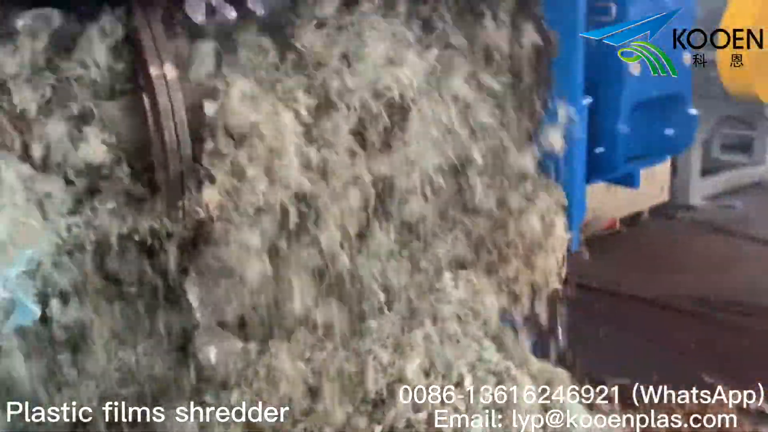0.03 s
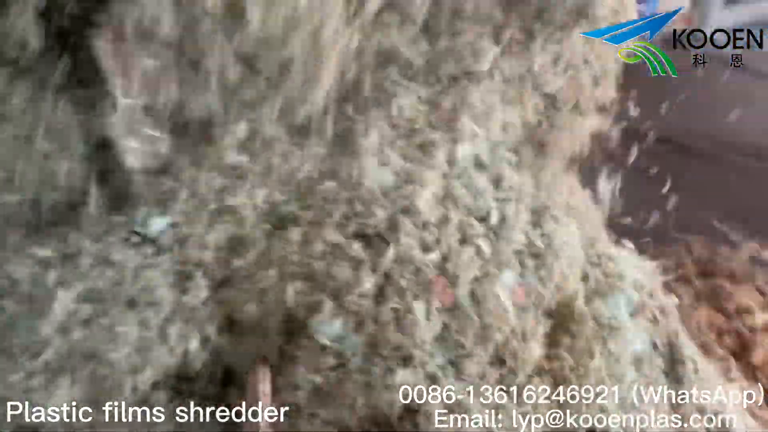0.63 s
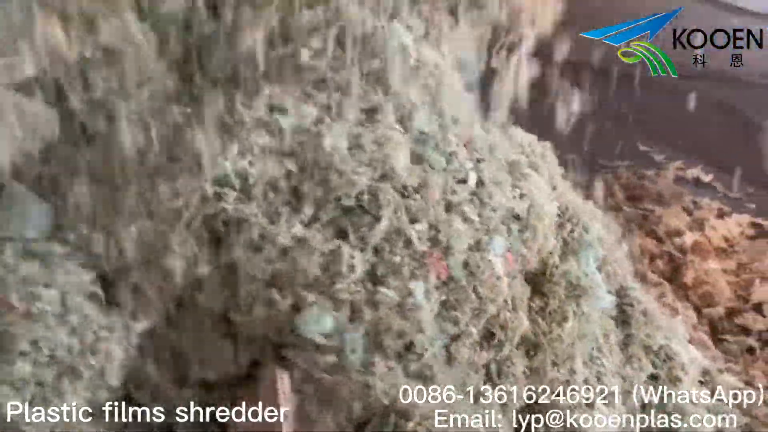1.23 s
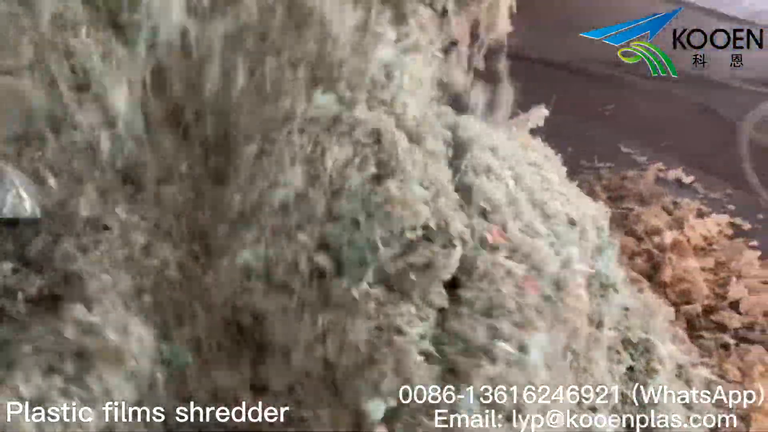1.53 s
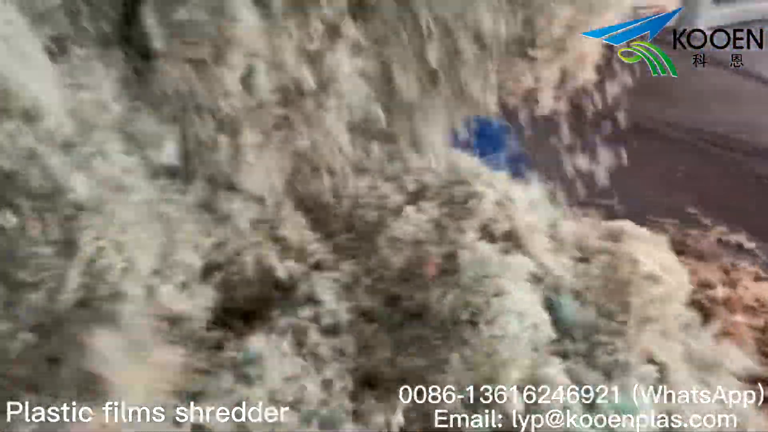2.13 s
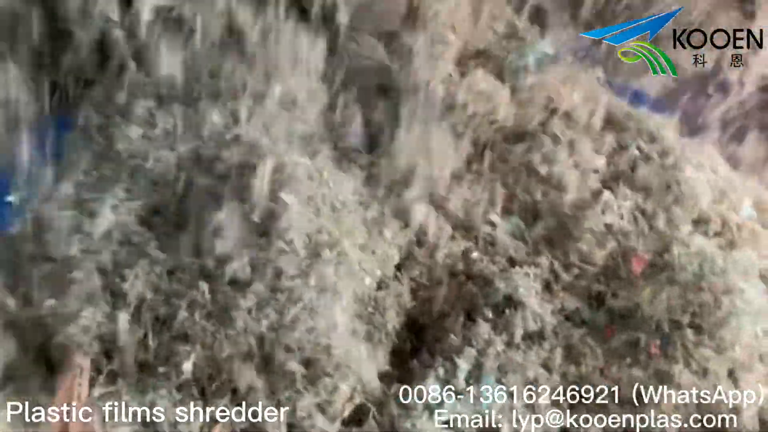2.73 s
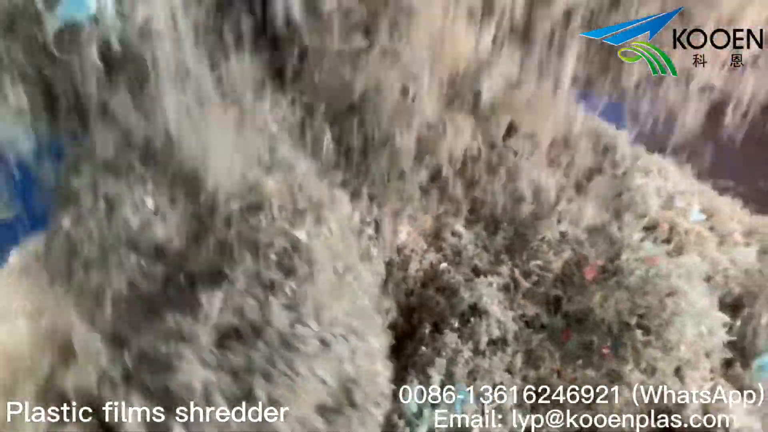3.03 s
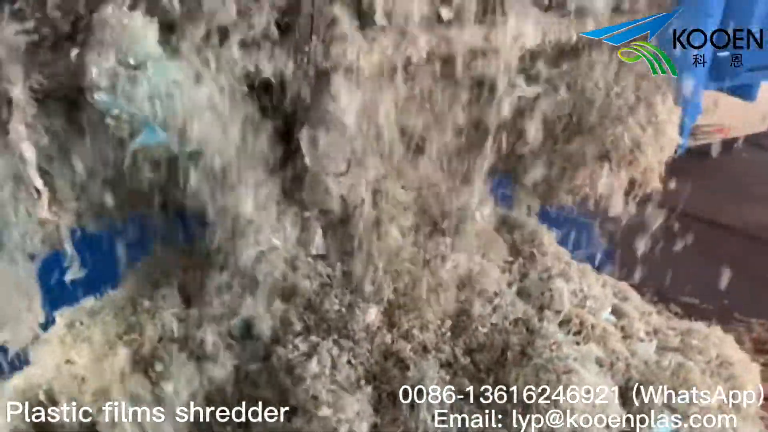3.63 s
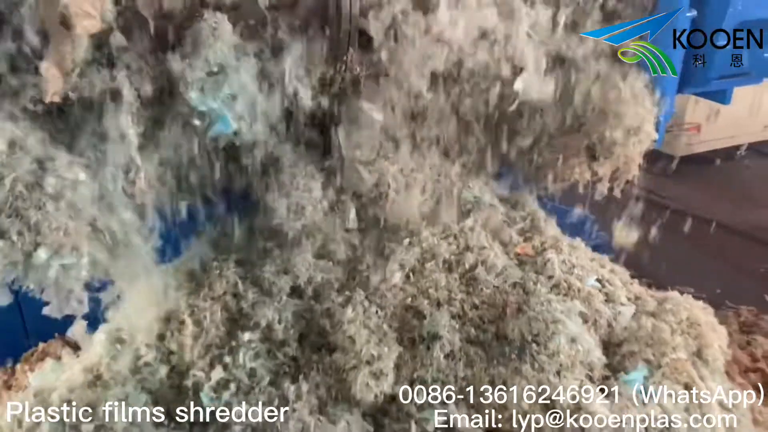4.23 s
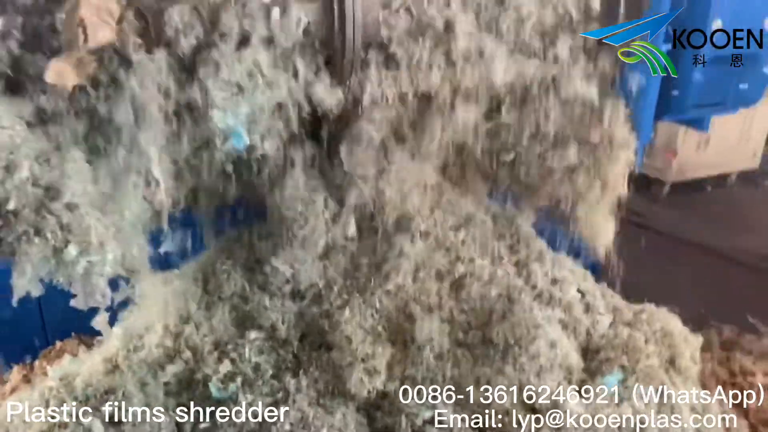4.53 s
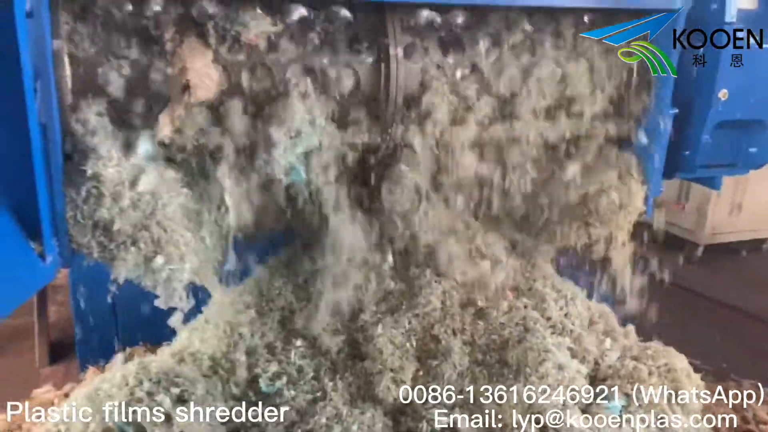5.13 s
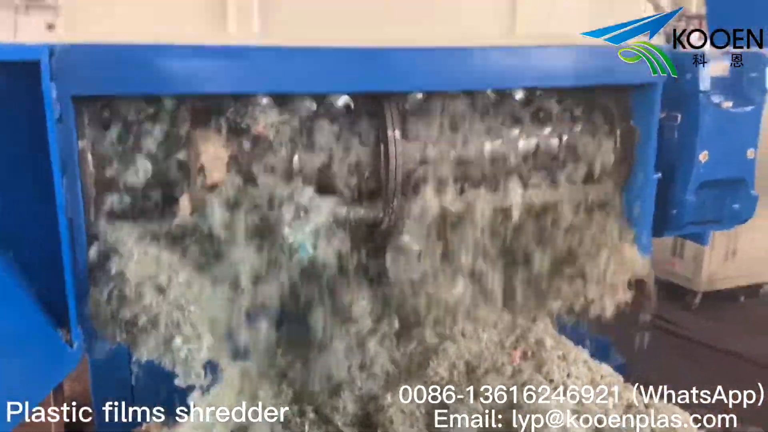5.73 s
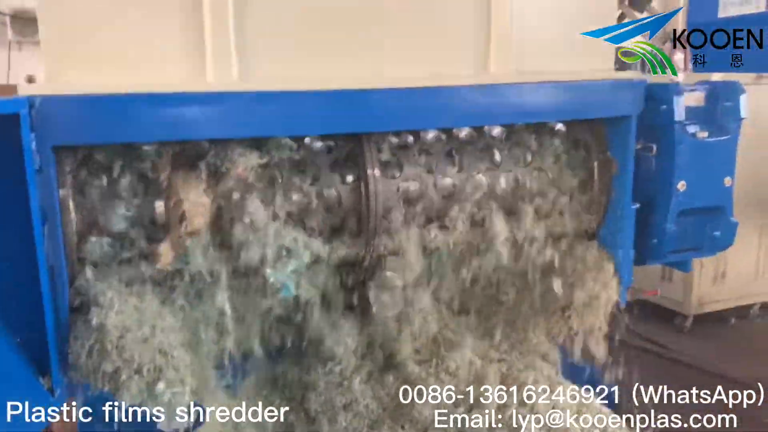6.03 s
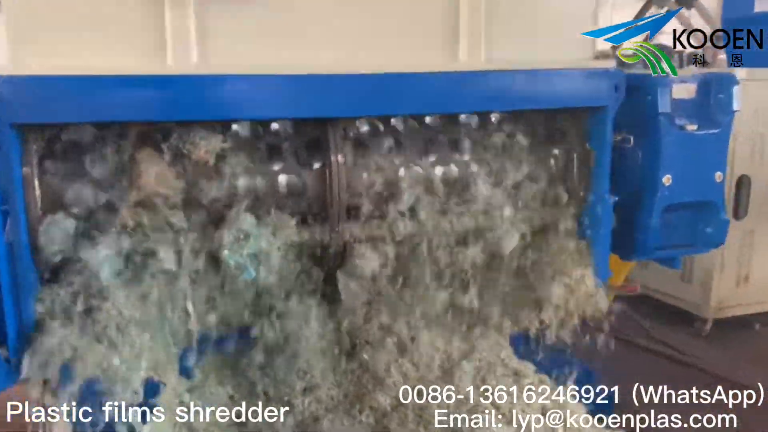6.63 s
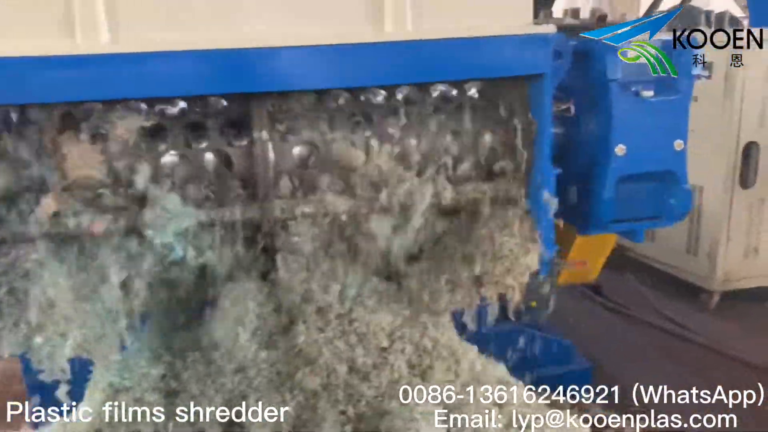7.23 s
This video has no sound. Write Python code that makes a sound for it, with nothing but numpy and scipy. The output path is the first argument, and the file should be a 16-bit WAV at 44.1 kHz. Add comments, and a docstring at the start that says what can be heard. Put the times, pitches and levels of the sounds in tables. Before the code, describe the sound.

An industrial shredder drones with a deep throb as plastic film churns, grinds and rustles out, with a few thumps and hard knocks.

```python
"""A throbbing drone fills a factory hall: a single-shaft shredder's knife rows drive its housing.
The microphone stands close to the screen, then moves a step back. Plastic film churns and grinds inside,
squeaks on the knives and rustles out through the screen, whose steel sings faintly. Wads thump in the
hopper; hard lumps knock in the cutting chamber, and the limiter ducks for a moment at the loudest."""
import sys
import numpy as np
from scipy import signal
from scipy.fft import rfft, irfft
from scipy.io import wavfile
from scipy.ndimage import uniform_filter1d

SR = 44100
rng = np.random.default_rng(int(sys.argv[2]) if len(sys.argv) > 2 else 0)


def bounce(signal):
    """Save signal as a 16-bit WAV file at the path given by the first command-line argument."""
    frames = np.transpose(np.atleast_2d(signal))
    limited = np.clip(frames, -1, 1)
    pcm = np.round(limited * 32767).astype(np.int16)
    wavfile.write(sys.argv[1], SR, pcm)


N = 321048

# the knives bite at an even rate; the drone swells at each bite, a little earlier with every second
BITES_PER_S, FIRST_SWELL_S, SWELL_CREEP_S_PER_S = 5.752, .032, .0032
# the microphone steps back and the machine's bass falls away
STEP_BACK_S, STEP_LENGTH_S, STEP_LOSS_DB = 3.93, 0.96, 6
# film inside the machine: time_s, churning_db, grinding_db, scraping_db
FILM_FEED = [(0.0, -28, -37.5, -43), (0.5, -20.5, -32.5, -41.5), (0.9, -26, -36, -40),
             (2.0, -26.5, -36.5, -38.5), (2.6, -25.5, -36, -38.5), (3.0, -27.5, -37.5, -41.5),
             (3.7, -25.5, -37.5, -39), (4.75, -26, -34, -37), (5.3, -30.5, -35, -40),
             (5.6, -29.5, -38.5, -40.5), (5.9, -26, -33, -40), (6.5, -29.5, -33.5, -38),
             (7.28, -27.5, -30.5, -37)]


def from_db(db):
    """Decibels to gain."""
    return 10 ** (np.asarray(db) / 20)


def rms_one(x):
    """Scale to unit rms."""
    return x / np.sqrt(np.mean(x ** 2) + 1e-20)


def seconds():
    """Time of every sample."""
    return np.arange(N) / SR


def in_time(rows):
    """One curve for each column after a table's time column."""
    times, *columns = np.transpose(rows)
    return [np.interp(seconds(), times, column) for column in columns]


def swell(centre_s, half_length_s):
    """A smooth rise and fall of height 1 around a moment."""
    return np.exp(-((seconds() - centre_s) / half_length_s) ** 2)


def bins():
    """Frequency of every spectral bin."""
    return np.arange(N // 2 + 1) * SR / N


def gain_curve(points):
    """Gain per bin from (Hz, dB) points joined on a log axis."""
    hz, db = np.transpose(points)
    return from_db(np.interp(np.log(bins() + 1), np.log(hz), db))


def resonance(hz, width_hz):
    """Response of one damped resonance per bin."""
    return 1j * bins() * width_hz / (hz ** 2 - bins() ** 2 + 1j * bins() * width_hz)


def drift(rate_hz):
    """A slow random wander with spread 1."""
    points = N // 100
    hz = bins()[:points // 2 + 1]
    spectrum = rfft(rng.standard_normal(points)) * (hz > 0) / (1 + (hz / rate_hz) ** 2) ** 2
    return np.interp(np.arange(N) * points / N, np.arange(points), rms_one(irfft(spectrum, points)))


def white():
    """Two unrelated white noises."""
    return rng.standard_normal((2, N))


def grains(per_s, spread_db, share):
    """Random snaps of uneven size on a smooth bed; share is their part of the power."""
    sizes = from_db(spread_db * np.minimum(rng.exponential(1, (2, N)), 4))
    snaps = sizes * np.sign(white()) * (rng.random((2, N)) < per_s / SR)
    return np.sqrt(share) * rms_one(snaps) + np.sqrt(1 - share) * white()


def radiate(source, colour):
    """Colour a pair of excitations and spread them to left and right; rms 1."""
    # the hall makes the treble diffuse: frequency_hz, side_minus_mid_db
    hall_width = [(30, -26), (80, -18), (170, -16), (300, -11), (600, -2.5), (1100, 1), (11000, -1)]
    mid, side = rfft(source)
    width = gain_curve(hall_width)
    pair = (mid + side * width * [[1], [-1]]) / np.sqrt(1 + width ** 2)
    return rms_one(irfft(pair * colour, N))


def hall_tone(cycles):
    """A tone of random phase; the hall puts either channel a quarter cycle ahead of the other."""
    apart = rng.choice([-1, 1]) * np.array([[0], [1 / 4]])
    return np.sin(2 * np.pi * (cycles + rng.random() + apart))


def stepped_back():
    """How far the microphone has moved back, from 0 to 1."""
    return np.clip((seconds() - STEP_BACK_S) / STEP_LENGTH_S, 0, 1)


def nearness_db():
    """Level of the machine's bass against that at the close position."""
    return -STEP_LOSS_DB * stepped_back()


def bite():
    """Swings from -1 between bites to 1 as a knife row digs in."""
    return np.cos(2 * np.pi * BITES_PER_S * (seconds() * (1 + SWELL_CREEP_S_PER_S) - FIRST_SWELL_S))


def rotor_tones(orders, lag_s, waver, lean_db=0, pointed=1):
    """Multiples of the bite rate swell together at each bite, each wavering a little."""
    t = seconds()
    # the swells creep earlier, while the centre pitch stays put
    slip = BITES_PER_S * (SWELL_CREEP_S_PER_S * t - FIRST_SWELL_S - lag_s)
    centre = np.mean([multiple for multiple, db in orders])
    out = 0
    for multiple, db in orders:
        step = multiple - centre
        cycles = multiple * BITES_PER_S * t + step * slip
        unsteady = 1 + waver * (drift(1.1) + 1j * drift(1.0))
        gain = from_db(db + np.clip(step, -.5, 2) * lean_db) * (pointed if abs(step) > 1 else 1)
        out = out + gain * np.real(unsteady * np.exp(2j * np.pi * cycles))
    return np.sqrt(2) * out


def housing(drone_db, upper_drone_db, boom_db, upper_boom_db, upper_rise_db, pan_db):
    """Knife rows drive two housing resonances, louder with effort; uneven feed adds a boom to each."""
    # multiples of the bite rate that each resonance picks out: multiple, level_db
    drone_orders = [(25, -25), (26, -4.3), (27, -3.6), (28, -14.5)]
    upper_orders = [(33, -18.5), (34, -6.5), (35, -3.5), (36, -17)]
    # how hard the rotor works: time_s, level_db
    effort = [(0, -1.5), (1.0, -5), (2.0, -1.5), (3.0, 0.3), (3.9, 0), (4.35, -0.6), (6.4, -0.2),
              (7.28, -1.5)]
    # the drone's lean between neighbours; an even pair throbs deepest: time_s, db_per_multiple
    lean = [(0, 1.5), (2, 2.2), (2.5, -1), (4.1, 2), (4.4, -4.5), (5.1, -3), (5.5, -5), (7.3, -4.5)]
    # shape of the swells (1 pointed, 0 round, below 0 flat as the knives stay buried): time_s, shape
    swell_shape = [(0, 1.3), (2.25, 1.1), (2.6, -.2), (3.2, .1), (4.1, -.3), (5, .3), (7.28, .6)]
    effort_db, = in_time(effort)
    lean_db, = in_time(lean)
    pointed, = in_time(swell_shape)
    drone = rotor_tones(drone_orders, lag_s=0, waver=.06, lean_db=lean_db, pointed=pointed)
    boom = radiate(white(), resonance(153.5, 32) ** 2)
    # the boom swells with each bite and fills the hall, so it fades less from a step back
    main = from_db(nearness_db()) * drone + from_db(boom_db + 3 * bite() + .7 * nearness_db()) * boom
    upper_drone = rotor_tones(upper_orders, lag_s=0.06, waver=0.16)
    upper_boom = from_db(upper_boom_db) * radiate(white(), resonance(202.8, 13.6) ** 2)
    # the upper resonance stands in the hall and is a little louder a step back
    upper = (upper_drone + upper_boom) * from_db(upper_rise_db * stepped_back())
    both = from_db(drone_db) * main + from_db(upper_drone_db) * upper
    return both * from_db(effort_db) * from_db([[pan_db], [-pan_db]])


def drive(frame_db, rumble_db, hum_db):
    """The motor hums, the gears whine and the frame shakes."""
    # steady tones of motor and gearbox: pitch_hz, level_db
    hum_tones = [(318.9, 3), (638, -13)]
    # rise and fall of that hum: time_s, level_db
    hum_level = [(0, -4), (.4, -3.5), (.7, 2.5), (1.2, 3.5), (2, -2.5), (3.0, -1.5), (4.1, -13), (4.8, -5),
                 (6.5, -14), (7.28, -8)]
    # multiples of the bite rate that the frame picks out: multiple, level_db
    frame_orders = [(8, -8.5), (10, -14), (18, -13)]
    # the frame's rumble: frequency_hz, density_db
    rumble_spectrum = [(15, -23), (30, -33), (44, -31), (60, -8), (80, -11.5), (102, -4), (130, -11),
                       (180, -7.5), (300, -54)]
    # mains hum and gear whine, unmoved by the load: pitch_hz, level_db
    whines = [(100, -40), (1749, -55)]
    t = seconds()
    humming_db, = in_time(hum_level)
    hum = sum(from_db(db + .8 * drift(3)) * np.sin(2 * np.pi * hz * t + .12 * drift(2))
              for hz, db in hum_tones)
    frame = rotor_tones(frame_orders, lag_s=0.0376, waver=0.38)
    frame = frame + from_db(rumble_db) * radiate(white(), gain_curve(rumble_spectrum))
    whine = sum(from_db(db + drift(3)) * np.sqrt(2) * np.sin(2 * np.pi * hz * t + drift(1))
                for hz, db in whines)
    return whine + from_db(hum_db + humming_db) * hum + from_db(frame_db + nearness_db()) * frame


def rubbed_steel(rings, waver_db):
    """Friction keeps narrow steel resonances singing, each coming and going."""
    return sum(from_db(db + waver_db * drift(7.0)) * radiate(white(), resonance(hz, width_hz))
               for hz, width_hz, db in rings)


def cutting(churn_db, panels_db, bite_db, grind_db, rings_db):
    """Film is churned and torn inside the chamber; close up, the churning pulses slightly at each bite."""
    # low churning and midrange grinding: frequency_hz, density_db
    churn_spectrum = [(100, -12), (170, 9.5), (230, 2), (300, 3), (400, -2.5), (520, -1.5), (650, -8.5),
                      (900, -18), (1500, -69)]
    grind_spectrum = [(400, 1), (680, 1.5), (1000, 2.5), (1400, -0.5), (1900, -4), (2500, -4.5),
                      (3100, -17.5), (6000, -51)]
    # housing panels rung by tumbling film, and the chamber's rubbed steel: pitch_hz, width_hz, level_db
    panel_rings = [(277.6, 14, -3), (367.6, 8, -6.5), (401, 9.8, -4), (439.5, 5.6, -4), (478.5, 10.5, -2.5),
                   (548, 10.5, -5.5)]
    chamber_rings = [(598, 12, -16), (1533, 25, -24), (2135, 35, -24)]
    churning_db, grinding_db, _ = in_time(FILM_FEED)
    tumbling = from_db(drift(33) + .5 * drift(6)) * grains(per_s=700, spread_db=2.4, share=0.25)
    churn = from_db(churn_db) * radiate(tumbling, gain_curve(churn_spectrum))
    churn += from_db(panels_db) * rubbed_steel(panel_rings, waver_db=2)
    churn *= from_db(bite_db * bite() * (1 - stepped_back()))
    tearing = from_db(1.5 * drift(32)) * grains(per_s=700, spread_db=1.6, share=0.24)
    grind = from_db(grind_db) * radiate(tearing, gain_curve(grind_spectrum))
    grind += from_db(rings_db) * rubbed_steel(chamber_rings, waver_db=1.5)
    return from_db(churning_db) * churn + from_db(grinding_db) * grind


def shower_db():
    """Levels of the rustle and the hiss: a steady flow of flakes that surges as clumps break loose."""
    # flakes passing the holes and falling: time_s, rustle_db, hiss_db
    flow = [(0.0, -43.5, -42.5), (0.55, -43.5, -39), (1.4, -36.5, -35), (3.0, -36, -34), (4.4, -33, -34),
            (5.0, -35.5, -40.5), (5.45, -39.5, -36.5), (6.0, -41.5, -43.5), (7.28, -35, -38.5)]
    # clumps pouring down: centre_s, half_length_s, above_flow_db
    clumps = [(1.447, 0.06, 3.5), (1.565, 0.047, 3), (1.833, 0.14, 2.5), (2.79, 0.047, 2),
              (3.228, 0.018, 1.5), (3.42, .03, 1.5), (3.53, 0.086, 4), (3.92, 0.024, 1.5),
              (4.317, 0.044, -0.5), (4.7, 0.15, 8), (5.402, 0.11, 2), (6.84, 0.13, 3)]
    surges_db = sum(db * swell(centre_s, half_length_s) for centre_s, half_length_s, db in clumps)
    return np.array(in_time(flow)) + surges_db


def tufts_db(per_s, size_db, fade_s):
    """Small tufts tear off at random: the rustle jumps and sinks back."""
    tears = (rng.random(N) < per_s / SR) * rng.uniform(.4, 1, N)
    surge = signal.lfilter([1], [1, -np.exp(-1 / (fade_s * SR))], tears)
    return size_db * (np.minimum(surge, 1.5) - surge.mean())


def patchy_treble(x, depth_db):
    """Random gains on short, narrow patches of the spectrum give the treble a watery warble."""
    _, _, cells = signal.stft(x, nperseg=1024)
    patches = uniform_filter1d(rng.standard_normal(cells.shape[1:]), size=3, axis=0)  # across frequency
    patches = uniform_filter1d(patches, size=7, axis=1)  # along time
    gain = rms_one(from_db(depth_db * np.clip(rms_one(patches), -3, 1.6)))
    return signal.istft(cells * gain, nperseg=1024)[1][:, :N]


def flakes(scrape_db, rustle_db, hiss_db):
    """Flakes scrape past the knives, rustle through the screen and hiss as they shower down."""
    # colours of the three noises: frequency_hz, density_db
    scrape_spectrum = [(1600, -8), (2400, -1.5), (2900, 5), (3500, 4), (3950, 4.5), (4150, 2.5),
                       (5500, -7.5)]
    rustle_spectrum = [(3300, -8), (4100, 1.5), (4500, 6.5), (5300, 10.5), (5900, 9), (6700, 9.5),
                       (7100, -6), (7800, 9.5), (8600, -38), (12000, 3.5)]
    hiss_spectrum = [(7500, -35), (7930, -15), (8040, -1), (8180, 0), (8400, -4), (8900, -7.5), (9500, -10),
                     (10400, -9.5), (11700, -15), (13000, -30)]
    # the hiss leans to the microphone's right: frequency_hz, left_minus_right_db
    hiss_pan = [(7700, 0), (8100, -10), (8900, -8), (9900, 0)]
    scraping_db = in_time(FILM_FEED)[2] + .7 * drift(14)
    rustling_db, hissing_db = shower_db()
    scrape = radiate(grains(per_s=3000, spread_db=1.5, share=0.24), gain_curve(scrape_spectrum))
    rustle = radiate(grains(per_s=3000, spread_db=4.6, share=0.45), gain_curve(rustle_spectrum))
    lean = np.sqrt(gain_curve(hiss_pan))
    hiss_colour = gain_curve(hiss_spectrum) * np.array([lean, 1 / lean])
    hiss_gain = from_db(hiss_db + hissing_db + drift(27))
    hiss = hiss_gain * radiate(grains(per_s=4100, spread_db=1.2, share=0.23), hiss_colour)
    tufts = from_db(tufts_db(per_s=14, size_db=2.4, fade_s=.025))
    shreds = from_db(scrape_db + scraping_db) * scrape + from_db(rustle_db + rustling_db) * rustle
    return tufts * patchy_treble(shreds, depth_db=4) + hiss


def singing_screen(average_db, db_per_rustle_db, width_hz):
    """Flakes pressed through the holes set the screen's many modes ringing, more so in a heavy flow."""
    # modes of the perforated screen: pitch_hz, level_db
    screen_modes = [(3140, -11), (3490, -7), (3660, -7), (3785, -7), (3828, -8), (4200, -9), (5100, -9),
                    (5360, -9), (5490, -10), (5620, -5), (5860, -10), (6010, -9), (6140, -6), (6420, -10),
                    (7240, -13), (8030, -5), (8140, -3), (9700, -15), (10190, -10), (10290, -14)]
    rustling_db, _ = shower_db()
    level_db = average_db + db_per_rustle_db * (rustling_db - rustling_db.mean())
    rings = [(hz, width_hz, db) for hz, db in screen_modes]
    return from_db(level_db) * rubbed_steel(rings, waver_db=2.8)


def knife_squeaks(wander_hz, flicker_db):
    """The knives ring faintly under the scraping; film sticks and slips on them in unsteady squeaks, and stiff
    scraps snap with brief tones."""
    # notes of the rubbed knives: pitch_hz, width_hz, level_db
    knife_rings = [(3795, 50, -13), (3921, 12, -8), (8165, 45, -10), (6143, 20, -16)]
    # film caught on the knives, and brief tones of stiff scraps snapping in a crunch: centre_s, half_length_s,
    # pitch_hz, level_db
    squeaks = [(.555, .025, 2620, -37), (.57, .035, 2390, -38), (2.65, .04, 3768, -39),
               (2.65, .04, 3903, -40), (2.8, .06, 8170, -30), (3.19, .065, 3822, -32),
               (3.36, .06, 3785, -40), (3.93, .06, 6143, -40), (3.97, .05, 3795, -36.5),
               (4.32, .055, 3795, -33), (4.32, .11, 6143, -43), (4.85, .19, 6143, -41),
               (5.42, .09, 5624, -43), (5.68, .12, 3924, -38.5), (5.8, .04, 3921, -31),
               (5.933, .008, 2060, -29), (5.94, .04, 3921, -34.5)]
    _, _, scraping_db = in_time(FILM_FEED)
    out = from_db(scraping_db) * rubbed_steel(knife_rings, waver_db=1.5)
    for centre_s, half_length_s, hz, db in squeaks:
        reach_s = 3 * half_length_s
        span = slice(max(round((centre_s - reach_s) * SR), 0), round((centre_s + reach_s) * SR))
        cycles = np.cumsum(hz + wander_hz * drift(60)[span]) / SR
        level = from_db(db + flicker_db * drift(50)[span]) * swell(centre_s, half_length_s)[span]
        out[:, span] += np.sqrt(2) * level * hall_tone(cycles)
    return out


def hopper_thumps(thump_db, attack_s, t60_s):
    """A thick wad is dragged under a knife, and the hopper walls boom briefly."""
    # thick wads: start_s, level_db
    wads = [(.335, 0), (2.44, -4), (2.58, 0), (6.93, -2)]
    # modes of the hopper walls: pitch_hz, level_db
    hopper_modes = [(268, 4), (292, 5), (395, -10.5)]
    out, t = np.zeros(N), np.arange(SR // 2) / SR
    envelope = (1 - np.exp(-t / attack_s)) * from_db(thump_db - 60 * t / t60_s)
    for start_s, blow_db in wads:
        boom = sum(from_db(db) * np.sin(2 * np.pi * (hz * t + rng.random())) for hz, db in hopper_modes)
        start = round(start_s * SR)
        out[start:start + len(t)] += from_db(blow_db) * (envelope * boom)[:N - start]
    return out


def lump_knocks(ring_db, crack_db, crack_t60_s, crunch_t60_s, hall_db, hall_t60_s):
    """A lump is caught and crushed: cracks, a dull crunch, ringing steel and a short wash of hall."""
    # hard bits between the knives: start_s, level_db, dullness_db_per_octave, steel_db, crunch_db
    blows = [(.39, -21, 2, -12, -2), (.466, -24, 3, -10, -4), (.555, -14, 0, -12, 0),
             (.575, -18.5, 0, -10, -2), (.613, -21, 2, -10, -2), (4.799, -22, 3, -6, -6),
             (5.0595, -4, 0, 6.5, -10), (5.0645, -1.5, 0, -16, -6), (5.07, -1, 1, -16, -6),
             (5.079, -14, 1, -8, -5), (5.167, -18.5, 8, 5, -12), (5.917, -15, 3, -8, 1),
             (5.933, -7, .5, -9, .5), (5.96, -15, 11, 2, 6)]
    # modes of the struck chamber: pitch_hz, level_db, t60_s
    chamber_modes = [(370, -11, .08), (530, -12, .1), (598, -5.5, .12), (700, -16, .06), (912, -11, .3),
                     (1000, -13, .14), (1230, -10, .12), (1421, -13, .16), (1537, -9.5, .27),
                     (1585, -16, .38), (1663, -16, .3), (1850, -14, .1), (2020, -12, .1), (2085, -12, .1),
                     (2140, -4.5, .13), (2228, -5.5, .14), (2445, -14, .17), (2853, -14, .18),
                     (2970, -20, .2), (3400, -21, .08), (3540, -19, .12), (4060, -22, .12),
                     (4200, -22, .14)]
    # the sharp crack and the dull crunch: frequency_hz, density_db
    crack_spectrum = [(150, -10), (500, -1), (1200, -3), (2100, 2), (3600, -9), (4800, -22), (7000, -27),
                      (8400, -12), (11000, -16)]
    crunch_spectrum = [(150, -14), (300, -2), (550, -2), (750, -1), (960, 1), (1250, -1), (1600, -14),
                       (3000, -30), (6000, -50)]
    out, t = np.zeros((2, N)), np.arange(SR // 2) / SR
    crack_noise = radiate(white(), gain_curve(crack_spectrum))
    crunch_noise = radiate(white(), gain_curve(crunch_spectrum))
    crack_and_wash = from_db(crack_db - 60 * t / crack_t60_s) + from_db(hall_db - 60 * t / hall_t60_s)
    octaves_above_1khz = np.log2(np.maximum(np.fft.rfftfreq(len(t), 1 / SR) / 1000, 1))
    for start_s, blow_db, dullness, steel_db, crunch_db in blows:
        start = round(start_s * SR)
        span = slice(start, start + len(t))
        # each blow lands elsewhere, so every mode reaches the microphone with a new phase
        ring = sum(from_db(db - 60 * t / t60_s) * hall_tone(hz * t) for hz, db, t60_s in chamber_modes)
        crunch = from_db(crack_db + crunch_db - 60 * t / crunch_t60_s) * crunch_noise[:, span]
        blow = from_db(ring_db + steel_db) * ring + crack_and_wash * crack_noise[:, span] + crunch
        # film wrapped round a lump cushions the blow
        cushioned = irfft(rfft(blow) * from_db(-dullness * octaves_above_1khz), len(t))
        out[:, span] += from_db(blow_db) * cushioned * (1 - t / t[-1])
    return out


def limiter(x, ceiling_db, attack_s, release_db_per_s):
    """The gain drops within milliseconds of an overload and creeps back."""
    over_db = np.maximum(20 * np.log10(np.abs(x).max(axis=0) + 1e-9) - ceiling_db, 0)
    release_db = release_db_per_s * seconds()
    held_db = np.maximum.accumulate(over_db + release_db) - release_db
    pole = np.exp(-1 / (attack_s * SR))
    return x * from_db(-signal.lfilter([1 - pole], [1, -pole], held_db))


def scene():
    """The whole shredder as it reaches the stereo microphone."""
    return (housing(drone_db=-11.5, upper_drone_db=-26, boom_db=-16.5, upper_boom_db=-3.0,
                    upper_rise_db=2.5, pan_db=-0.76)
            + drive(frame_db=-25.0, rumble_db=0.0, hum_db=-31.0)
            + hopper_thumps(thump_db=-14.5, attack_s=0.023, t60_s=0.19)
            + cutting(churn_db=1.8, panels_db=-11.5, bite_db=0.4, grind_db=4.0, rings_db=3.0)
            + flakes(scrape_db=8.0, rustle_db=1.5, hiss_db=0.45)
            + singing_screen(average_db=-45.5, db_per_rustle_db=1.3, width_hz=18)
            + knife_squeaks(wander_hz=14, flicker_db=2)
            + lump_knocks(ring_db=-7, crack_db=-15, crack_t60_s=0.047, crunch_t60_s=0.1,
                          hall_db=-24.5, hall_t60_s=0.39))


def record(dry):
    """Peaks are limited and rounded, and the treble is cut steeply above 11150 Hz."""
    limited = limiter(dry, ceiling_db=-2.06, attack_s=0.003, release_db_per_s=31)
    rounded = limited / (1 + (limited / .95) ** 8) ** (1 / 8)
    lowpass = signal.ellip(10, .05, 60, 11150, fs=SR, output="sos")
    return signal.sosfiltfilt(lowpass, rounded)


dry = scene()
out = record(dry)
bounce(out)
```